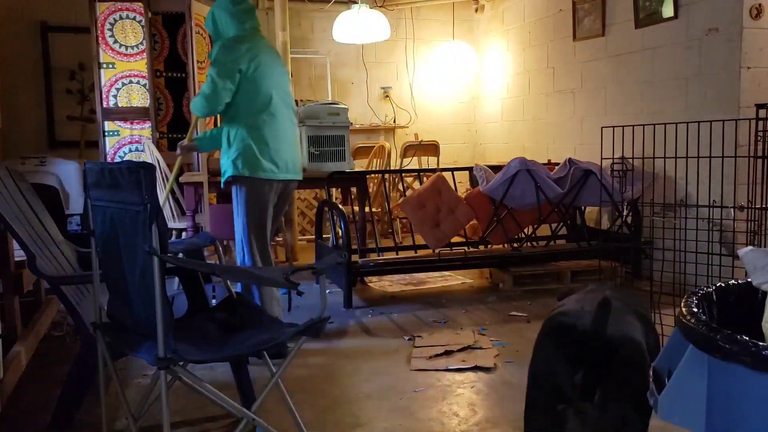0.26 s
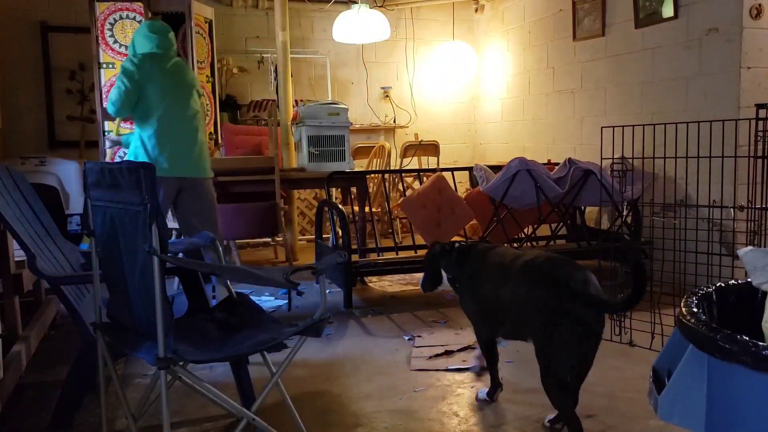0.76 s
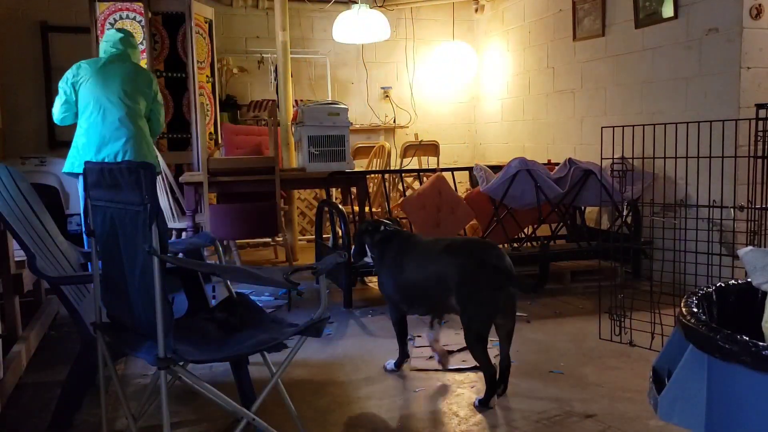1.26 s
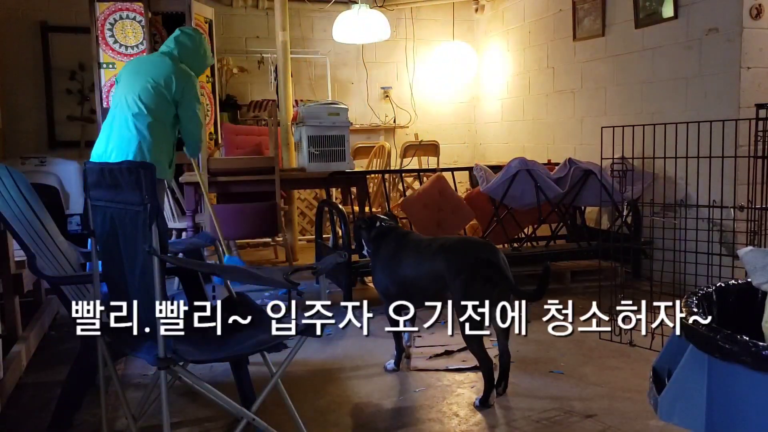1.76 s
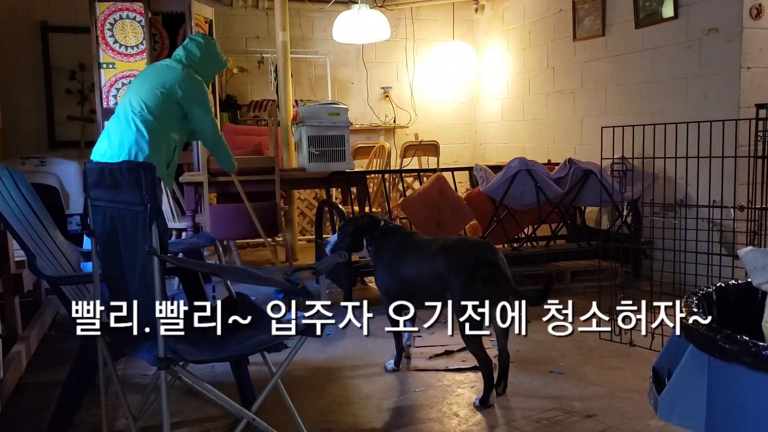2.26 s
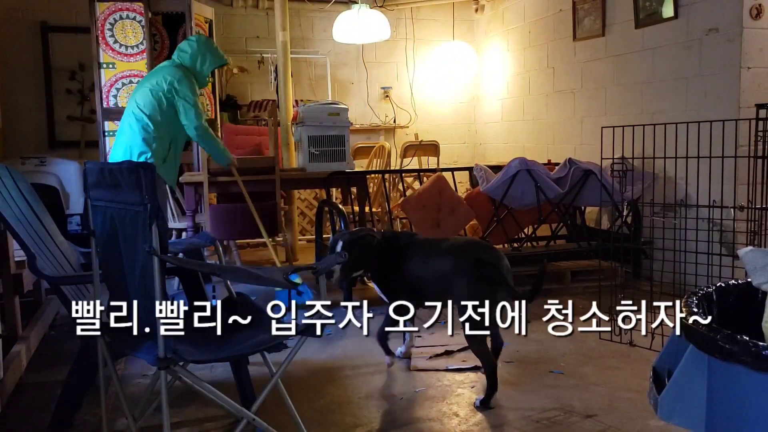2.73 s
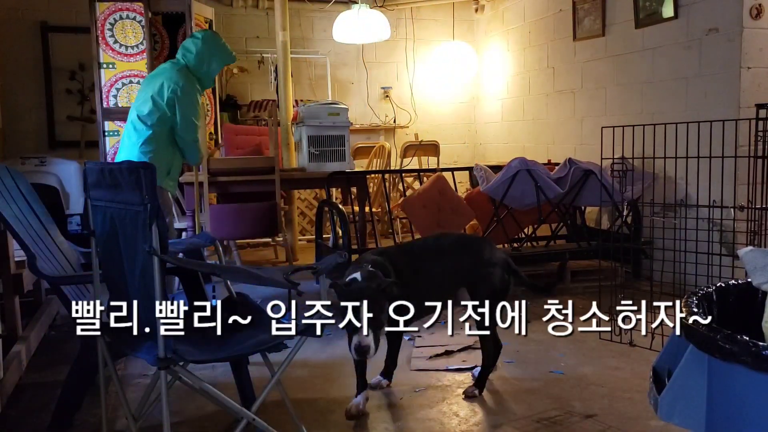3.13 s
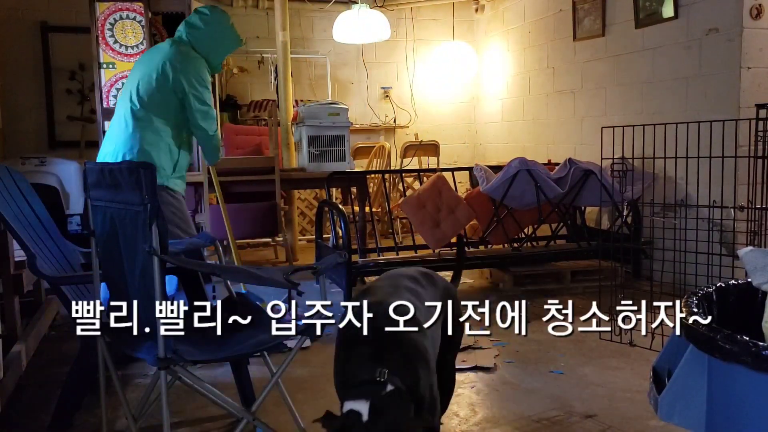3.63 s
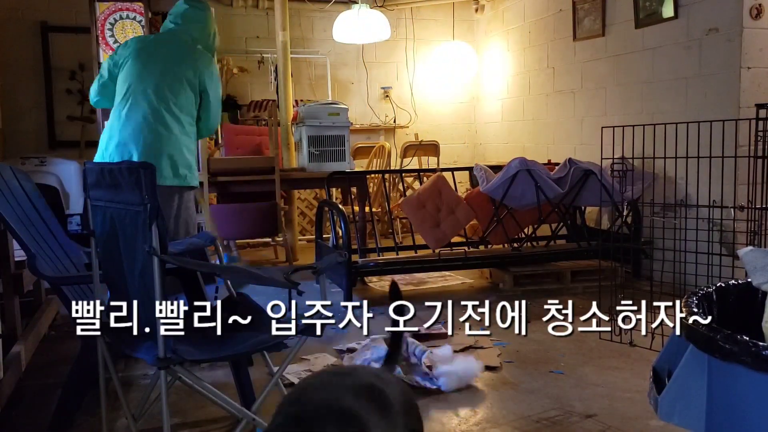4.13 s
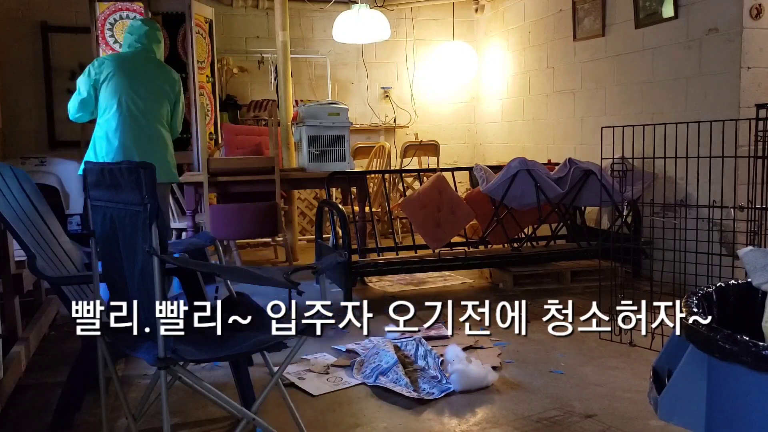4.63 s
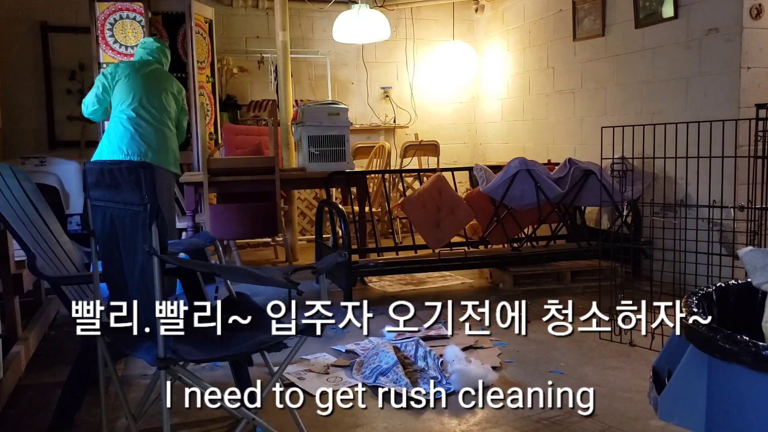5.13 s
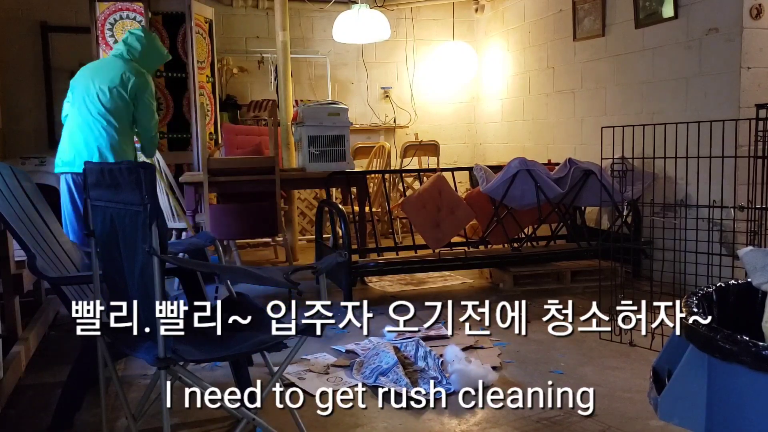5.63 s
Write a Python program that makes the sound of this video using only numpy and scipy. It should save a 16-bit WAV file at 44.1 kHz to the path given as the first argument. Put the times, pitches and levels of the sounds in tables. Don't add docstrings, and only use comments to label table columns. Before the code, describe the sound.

A quiet low house rumble with faint hiss lies under everything in a hard-walled basement. Little happens at first beyond a light brush and a papery tick near 0.4 s. A strong bristly sweep swells at 0.5-0.8 s, then a clear hollow wooden knock strikes at about 1.07 s, with smaller rattles and scrapes after it. Another bright, clattering stroke comes at 1.55-1.7 s; a soft low paw-like thump and a sweep follow around 1.9-2.1 s. At 2.35-2.5 s two fast, loud hissing skims overlap, with a dragged sheet singing scratchily. There is a tiny dip at 2.72 s, then dry snaps until 2.95 s. Denser strokes run from 3.1 to 4.1 s, with a sharp crack at 3.3 s and a dull thud near 3.9 s. From 4.3 s to 6 s only sparse paper crackles, light brushes, small claw taps and very faint high tag rings remain.

```python
import sys
import numpy as np
from scipy import signal
from scipy.fft import irfft
from scipy.io import wavfile
from scipy.ndimage import uniform_filter1d

SR = 44100
rng = np.random.default_rng(int(sys.argv[2]) if len(sys.argv) > 2 else 0)


def dump(signal):
    limited = np.clip(np.atleast_2d(signal).T, -1, 1)
    pcm = np.round(limited * 32767).astype(np.int16)
    wavfile.write(sys.argv[1], SR, pcm)


def volts_from_decibels(level):
    exponent = np.asarray(level, float) / 20
    return 10 ** exponent


N = 259731

# (frequency [Hz], density [dB per Hz])
BRISTLES = [(2400, -22.5), (4000, -10.5), (5200, -13.5), (6300, -4.5), (7700, -1.5), (9200, -5.5),
            (11000, -2), (13500, 0.5), (15500, 2), (17000, -4.5)]
# (frequency [Hz], density [dB per Hz])
SCRAPE = [(1500, -24.5), (2400, -1.5), (3200, -1), (4100, -1), (5200, -1.5), (7000, -9.5), (10000, -11)]


def evened(x):
    return x / np.sqrt(np.mean(x ** 2) + 1e-20)


def read(points, hz):
    f, value = np.transpose(points)
    return np.interp(np.log(hz + 1), np.log(f + 1), value)


def coloured(x, points):
    gain = volts_from_decibels(read(points, np.fft.rfftfreq(1024, 1 / SR)))
    taps = np.fft.fftshift(irfft(gain)) * np.hanning(1024)
    return signal.oaconvolve(x, taps[None], "same", axes=1)


def add(mix, start_s, sound):
    part = mix[..., round(start_s * SR):][..., :sound.shape[-1]]
    part += sound[..., :part.shape[-1]]


def leaned(x, db):
    return x * volts_from_decibels(np.array([db / 2, -db / 2]).reshape(2, -1))


def paired(z, hz):
    # (frequency [Hz], left-right likeness [0..1])
    likeness = [(60, 0.98), (130, 0.97), (290, 0.91), (640, 0.36), (1410, 0.11), (3100, 0.022),
                (15000, 0.012)]
    same = np.clip(read(likeness, hz), 0, 1)[:, None]
    return np.array([z[0], same * z[0] + np.sqrt(1 - same ** 2) * z[1]])


def slips(per_s, spread_db):
    when, how_big, sign = rng.random((3, 2, N))
    size = volts_from_decibels(spread_db * np.minimum(-np.log(how_big + 1e-9), 5))
    releases = size * np.sign(sign - 0.5) * (when < per_s / SR)
    hz, _, z = signal.stft(releases, SR, nperseg=256)
    return signal.istft(paired(z, hz), SR, nperseg=256)[1][:, :N]


def house():
    # (frequency [Hz], density [dB per Hz])
    rumble = [(15, -1), (28, -33), (60, 3.5), (100, 3), (150, -6), (260, -13), (500, -22), (1000, -26),
              (1700, -34.5), (4000, -42.5), (6700, -38), (7700, -36.5), (8600, -41), (10500, -41),
              (15500, -32)]
    rumble_db, duct_db = -46, -66
    duct_hz, duct_width_hz = 840, 35
    frames, hz = N // 256 + 5, np.fft.rfftfreq(1024, 1 / SR)
    a, b, c, d, patches = rng.standard_normal((frames, 513, 5)).T
    patches = evened(uniform_filter1d(uniform_filter1d(patches, 10, 0), 14, 1))
    z = paired(np.array([a + 1j * b, c + 1j * d]), hz)

    def noise(gain):
        return evened(signal.istft(z * gain, nperseg=1024, noverlap=768)[1][:, :N])

    wash = noise(volts_from_decibels(read(rumble, hz)[:, None] + 1.62 * patches))
    hum = noise(1 / (1 + ((hz[:, None] - duct_hz) / (duct_width_hz / 2)) ** 2))
    return volts_from_decibels(rumble_db) * wash + volts_from_decibels(duct_db) * hum


def pressing(rows, settle, swell_db, paper_share):
    touch_s, touch_db = 0.024, -26
    fade_bend = 1.17
    paper_db, head_db, handle_db = -3.5, -4, -13
    handle_share, handle_jolt = 1, 1.33
    power = np.zeros((4, N // 32 + 2))
    for start_s, swell_s, fade_s, db, weight_db in rows:
        t = np.arange(power.shape[1]) * 32 / SR - start_s
        rise_s = [-0.03, 0, min(touch_s, 0.56 * swell_s), swell_s]
        rise = np.interp(t, rise_s, [-70, touch_db, swell_db, 0])
        fade = 20 * (np.maximum(t - swell_s, 0) / fade_s) ** fade_bend
        level = uniform_filter1d(db + rise - fade, size=15)
        weight = weight_db * np.exp(-settle * np.maximum(t, 0) / (swell_s + fade_s))
        paper = paper_db + paper_share * weight
        head = head_db + weight
        handle = handle_db + handle_share * weight + handle_jolt * np.maximum(weight, 0)
        parts = np.array([0 * t, paper, head, handle])
        power += volts_from_decibels(2 * np.maximum(level + parts, -200))
    return power


def broom():
    # (start [s], swell to full pressure [s], fade by 20 dB [s], bristle pressure [dB],
    # landing weight [dB]
    strokes = [(.745, 0.02, 0.15, -39.5, 3.5), (.532, .155, 0.13, -30, -9), (1.06, 0.009, 0.21, -47.5, 13),
               (1.178, 0.014, 0.15, -56, 9), (1.295, 0.048, 0.14, -41.5, 5.5), (1.54, 0.028, 0.03, -30, 7),
               (1.61, 0.068, 0.17, -35.5, -11.5), (1.99, 0.12, 0.091, -33.5, -21.5),
               (2.485, 0.079, 0.15, -39, 1.5), (2.62, 0.069, .03, -48, 1), (3.13, 0.059, 0.55, -43.5, -1),
               (3.255, 0.0098, 0.16, -39.5, -0.5), (3.42, 0.056, 0.079, -36.5, 0.5),
               (1.7, 0.08, 0.049, -42, 7), (4.07, 0.14, 0.084, -42, -1)]
    pushes = [(3.32, 0.065, 0.17, -29.5, -22), (3.54, 0.097, 0.16, -40.5, 6.5),
              (3.735, 0.069, 0.39, -33.5, -10.5), (3.88, 0.12, 0.21, -32.5, -26),
              (3.8, 0.17, 0.076, -49, 16.5), (.05, 0.065, .03, -56.5, -1), (.93, 0.046, 0.08, -55, 17),
              (1.97, 0.034, .03, -50, 17), (3.03, 0.073, .05, -61.5, -26), (5.04, 0.12, 0.11, -58.5, -17),
              (5.3, 0.14, 0.094, -61, -4), (5.5, 0.072, 0.098, -54, -14), (5.69, .1, 0.18, -61.5, -21)]
    skims = [
        (2.344, 0.023, 0.12, -32.5, -28),
        (2.39, 0.063, 0.11, -28.5, -30),
    ]
    brushes = [(-.02, 0.023, .03, -40.5, -48), (-.02, .035, 0.14, -48.5, -34),
               (.395, 0.1, 0.049, -59.5, 5.5), (.88, 0.0081, 0.16, -49.5, -9),
               (1.495, 0.013, 0.019, -51, -22), (1.92, 0.021, 0.046, -57.5, 10), (2.2, 0.12, .05, -59.5, 1),
               (2.72, 0.031, .06, -45, -30), (2.765, 0.053, 0.059, -46.5, -15), (2.82, 0.1, 0.034, -53, -6),
               (4.29, 0.054, 0.029, -51, -8.5), (4.458, 0.06, 0.11, -49, -45),
               (4.52, 0.034, 0.033, -53.5, 0), (4.64, 0.032, 0.079, -48, -7),
               (4.69, 0.081, 0.064, -52.5, -11), (4.97, .025, 0.02, -46.5, -21),
               (4.81, 0.033, 0.32, -63, -3), (5.16, 0.027, .05, -56, -32), (5.33, 0.021, .05, -60, -30),
               (5.59, 0.026, 0.046, -53, -30), (5.24, .016, 0.21, -58.5, -27),
               (5.44, 0.012, 0.12, -54.5, -7), (5.855, 0.015, .3, -60.5, 6.5)]
    # (frequency [Hz], density [dB per Hz])
    drag = [(500, -38.5), (900, -7), (1300, -3.5), (1900, -5.5), (2600, -11.5), (4000, -19)]
    # (frequency [Hz], density [dB per Hz])
    thrum = [(130, -5), (250, -8.5), (450, -7), (700, 1.5), (1100, -25.5), (1800, -24)]

    power = pressing(strokes, settle=3.9, swell_db=-4, paper_share=0.13)
    power += pressing(pushes, settle=3.9, swell_db=-10.5, paper_share=0.13)
    power += pressing(skims, settle=0.69, swell_db=-4, paper_share=0.13)
    power += pressing(brushes, settle=0.2, swell_db=-4, paper_share=0.26)
    on_tips, on_paper, on_head, on_handle = (
        np.interp(np.arange(N) / 32, np.arange(len(p)), np.sqrt(p)) for p in power)

    clumps = evened(uniform_filter1d(uniform_filter1d(rng.standard_normal(N), 130), 130))
    tips = evened(coloured(slips(per_s=12000, spread_db=0), BRISTLES)) * on_tips
    paper = evened(coloured(slips(per_s=8000, spread_db=4.5), SCRAPE)) * on_paper
    head = evened(coloured(slips(per_s=4000, spread_db=3.5), drag)) * on_head
    handle = evened(coloured(slips(per_s=1500, spread_db=3), thrum)) * on_handle
    return (tips + paper + head + handle) * volts_from_decibels(-2 + 2.15 * clumps)


def snaps():
    # (time [s], peak [dB], low part re peak [dB], left-right lean [dB])
    snap_rows = [(0.1655, -52, -28, 3.5), (0.409, -38, -35, -5), (0.4693, -42, -10, 0),
                 (1.069, -36.5, -7, 4.0), (1.1894, -39.5, -14, 4.0), (1.311, -39, -5, 2),
                 (1.428, -31.5, -17.5, 0), (2.2478, -58, -18, 1), (2.724, -31, -25, 3),
                 (2.8573, -34, -19, 6), (2.949, -29.5, -30, -3), (3.2653, -42, 8, 2),
                 (3.303, -26.5, -14, 1), (4.4712, -36.5, -41, 2), (4.5465, -32.5, -37, 4),
                 (4.667, -64, -17, 0), (4.7337, -45, -6, -1), (4.9092, -60, -30, 6.5),
                 (4.979, -30, -40, 8.5), (5.1396, -42, -37, 8), (5.2467, -39.5, -26, 7),
                 (5.3896, -45, -23, 3.5), (5.452, -42, -18, 3), (5.557, -37, -25, 2),
                 (5.6775, -51, -29, 10.5), (5.7254, -45, -26, 6.0), (5.7803, -39.5, -29, -1),
                 (5.8585, -43, -19, 5), (5.872, -54.5, 8.5, -6)]
    bright, dull = np.zeros((2, 2, N))
    t = np.arange(1500) / SR
    soft = 1 - np.exp(-t / 0.0013)
    for time_s, db, low_db, lean_db in snap_rows:
        decay = volts_from_decibels(db + 2 - 60 * t / 0.036)
        crackle = leaned(rng.standard_normal((2, len(t))) * decay * soft, lean_db)
        add(bright, time_s, crackle)
        add(dull, time_s, crackle * volts_from_decibels(low_db))
    return coloured(bright, BRISTLES) * volts_from_decibels(3) + coloured(dull, SCRAPE) * volts_from_decibels(18)


def pings():
    # (time [s], level [dB], pitch [Hz], t60 [s])
    ping_rows = [(.475, -56, 14400, .1), (.512, -56, 14700, .05), (1.921, -16, 169, 0.034),
                 (2.25, -50, 15000, .05), (3.921, -18.5, 292, 0.031), (4.670, -58, 1440, 0.033),
                 (4.692, -45.5, 1650, 0.024), (4.692, -50, 1920, 0.03), (5.022, -30, 870, 0.011),
                 (5.29, -64, 10900, 0.14), (5.33, -61, 10700, 0.12), (5.679, -53, 13000, .035),
                 (5.862, -52, 13100, .035), (4.915, -62, 11700, 0.045)]
    out, t = np.zeros(N), np.arange(SR // 4) / SR
    for time_s, db, hz, t60_s in ping_rows:
        onset = 1 - np.exp(-t * hz / 3)
        add(out, time_s, volts_from_decibels(db + 4 - 60 * t / t60_s) * np.sin(2 * np.pi * hz * t) * onset)
    return out


def knocks():
    # (time [s], blow [dB], contact time [ms], pitch factor of struck part [ratio], tilt [dB per octave])
    blows = [(1.066, -26.5, 1.73, 0.88, -2.3), (1.072, -18, 0.56, 1.026, -4.5),
             (1.091, -31.5, 0.4, 1.02, -2), (1.113, -40.5, 1.44, 1.0, 3), (1.183, -43, 0.77, 1.06, 1.1),
             (1.194, -40.5, 0.41, 0.68, 1.5), (1.214, -46, 0.61, 0.55, 1), (1.549, -42.5, 1.56, 1.7, 7),
             (1.554, -43, 0.71, 1.2, 5), (1.563, -48, 0.26, 0.98, 5.5), (1.57, -37.5, 0.41, 1.38, 1.5),
             (1.58, -28, .25, 1.48, -6), (3.875, -35, 0.96, 1.6, -5), (3.901, -38.5, 1.1, 0.8, 0.5)]
    # (frequency [Hz], level [dB], t60 [s])
    frame = [(144, 2, 0.19), (229, -8, 0.18), (330, -18, 0.049), (460, -18, 0.03), (572, 9, 0.052),
             (656, -8, 0.049), (872, -5.5, 0.45), (999, 8.5, 0.063), (1310, -19, .06), (1710, 10, 0.039),
             (2380, -14, 0.061)]
    out, t = np.zeros(N), np.arange(SR // 2) / SR
    for time_s, db, contact_ms, pitch, tilt_db in blows:
        ring = 0.33 + 0.43 * contact_ms
        modes = np.zeros(len(t))
        for hz, level_db, t60_s in frame:
            mode_db = level_db + tilt_db * np.log2(hz / frame[0][0])
            modes += volts_from_decibels(mode_db - 60 * t / (t60_s * ring)) * np.sin(2 * np.pi * hz * pitch * t)
        blow = np.hanning(max(3, round(contact_ms * SR / 1000)) + 2)
        add(out, time_s, volts_from_decibels(db) * np.convolve(modes, blow / blow.sum()))
    return signal.sosfilt(signal.butter(2, 95, "high", fs=SR, output="sos"), out)


def sheet():
    # (time [s], level [dB], pitch [Hz])
    glide = [
        (2.39, -40, 4150),
        (2.409, -36, 4000),
        (2.46, -34.5, 4000),
        (2.5, -41, 4160),
        (2.54, -66, 4400),
    ]
    width_hz = 1500
    time_s, db, hz = np.transpose(glide)
    t = np.arange(N) / SR
    turn = np.exp(2j * np.pi * np.cumsum(np.interp(t, time_s, hz)) / SR)
    r = np.exp(-np.pi * width_hz / SR)
    shifted = slips(per_s=2700, spread_db=3) / turn
    band = signal.lfilter([1], np.convolve([1, -r], [1, -r]), shifted) * turn
    return evened(band.real) * volts_from_decibels(np.interp(t, time_s, db, left=-120, right=-120))


def walls(x, wet_db, size):
    # (frequency [Hz], t60 [s])
    decay = [(100, 0.42), (300, 0.29), (1000, 0.15), (4000, 0.23), (15000, 0.047)]
    overlap = size * 3 // 4
    hz, t, z = signal.stft(x, SR, nperseg=size, noverlap=overlap)
    keep = volts_from_decibels(-120 * t[1] / read(decay, hz))
    power = abs(z) ** 2
    held = np.array([signal.lfilter([0, 0, 1 - k], [1, -k], power[:, i]) for i, k in enumerate(keep)])
    a, b = rng.standard_normal((len(t), len(hz), 2, 2)).T
    echo = paired(a + 1j * b, hz) * np.sqrt(held.transpose(1, 0, 2))
    return x + volts_from_decibels(wet_db) * signal.istft(echo, SR, nperseg=size, noverlap=overlap)[1][:, :N]


def scene():
    rustle = walls(broom() + sheet(), wet_db=3, size=256)
    rustle += walls(snaps(), wet_db=6, size=128) * volts_from_decibels(-9)
    dip_s, width_ms, dip_db = 2.718, 3.5, -16
    from_dip_ms = (np.arange(N) / SR - dip_s) * 1000
    rustle *= volts_from_decibels(dip_db * np.exp(-(from_dip_ms / width_ms) ** 2))
    near = pings()
    struck = walls((knocks() + near * volts_from_decibels(-18))[None], wet_db=-2, size=1024) * volts_from_decibels(-3.5)
    return rustle + struck + near + house()


def roll_off(x):
    return signal.sosfilt(signal.butter(12, 16300, fs=SR, output="sos"), x)


def record(dry):
    # (frequency [Hz], left-right level [dB])
    mic_lean = [(60, 0), (300, 2), (1000, 1.0), (4000, -0.1), (8000, 0), (11000, 2), (15000, 7)]
    left = coloured(dry[:1], [(f, db / 2) for f, db in mic_lean])
    right = coloured(dry[1:], [(f, -db / 2) for f, db in mic_lean])
    limit = signal.firwin(601, 15800, window=("kaiser", 5), fs=SR)
    mix = signal.oaconvolve(np.concatenate([left, right]), limit[None], "same", axes=1)
    return roll_off(mix)


dry = scene()
out = record(dry)
dump(out)
```